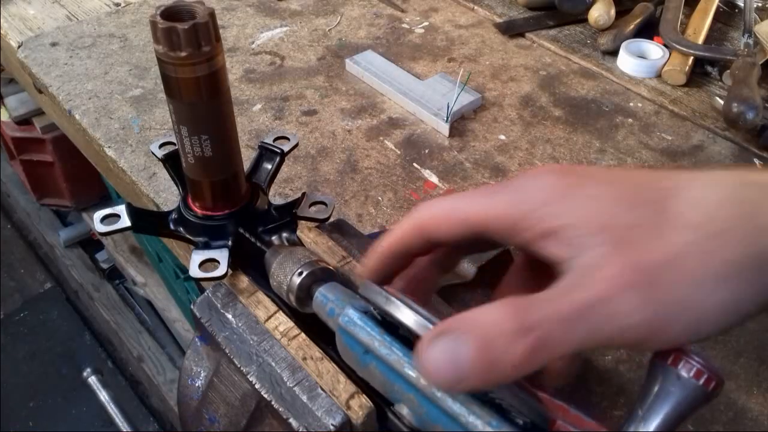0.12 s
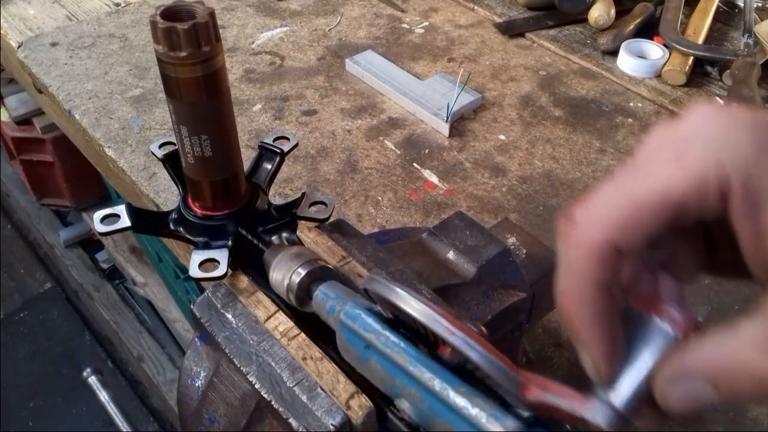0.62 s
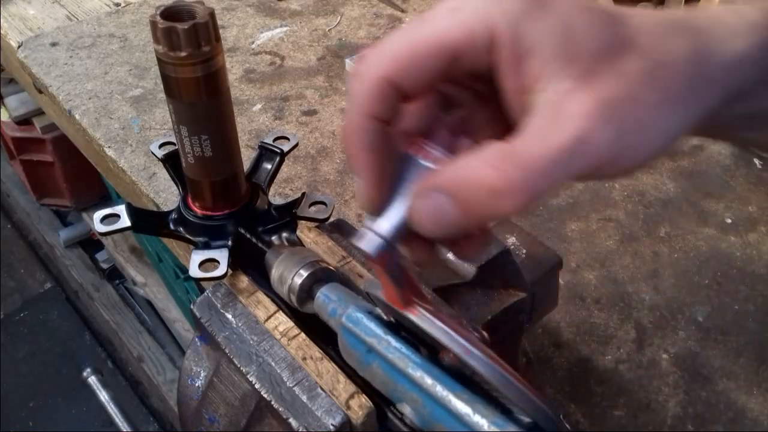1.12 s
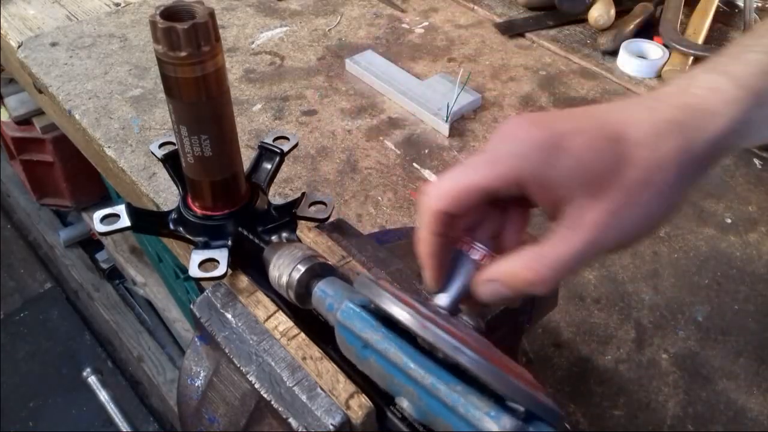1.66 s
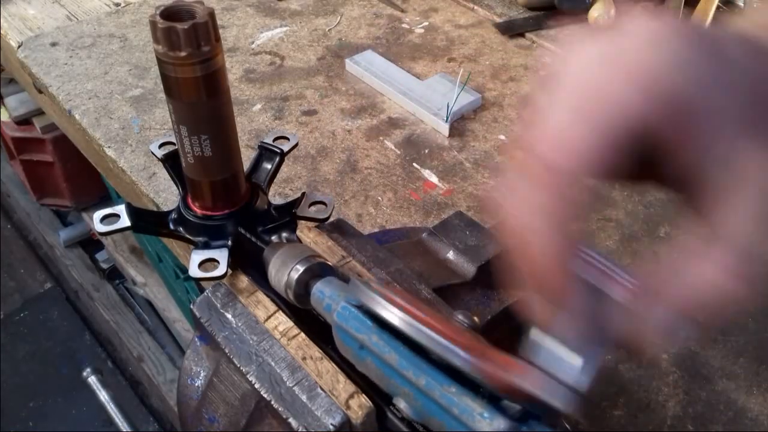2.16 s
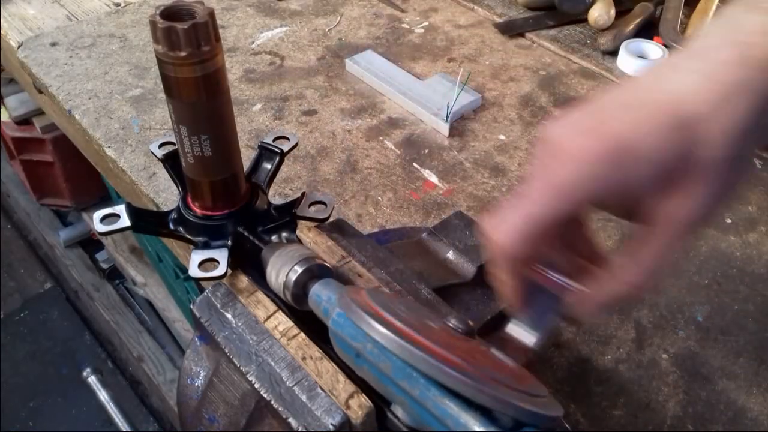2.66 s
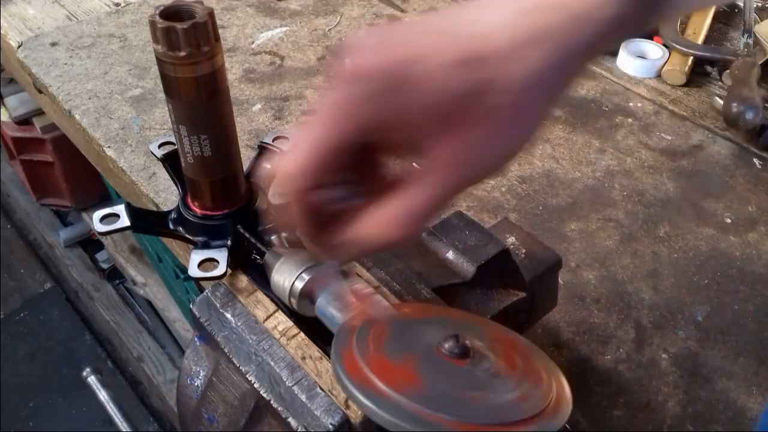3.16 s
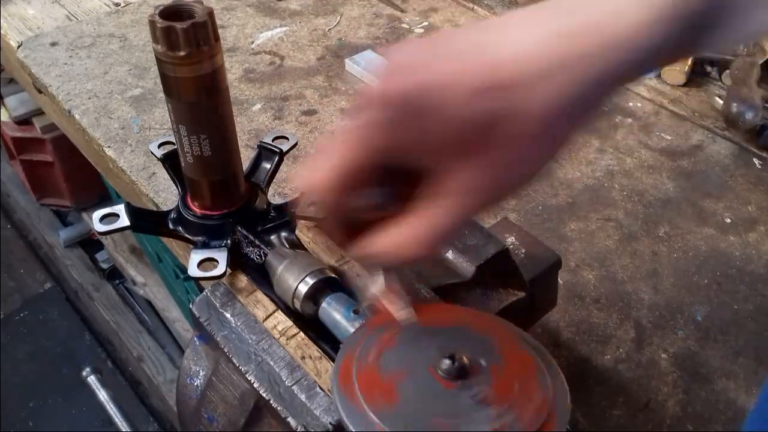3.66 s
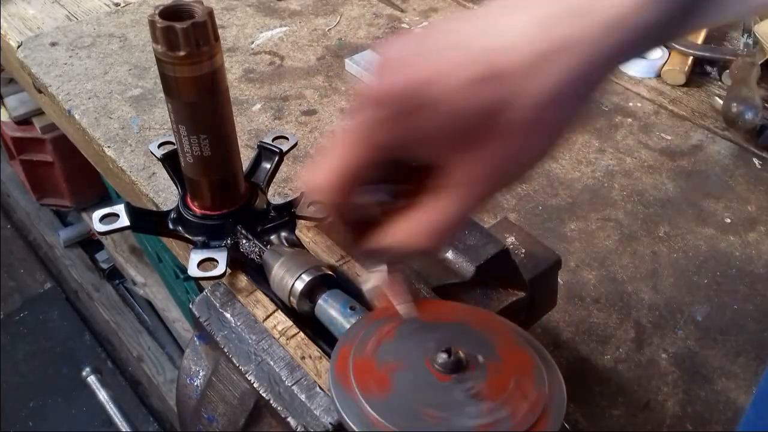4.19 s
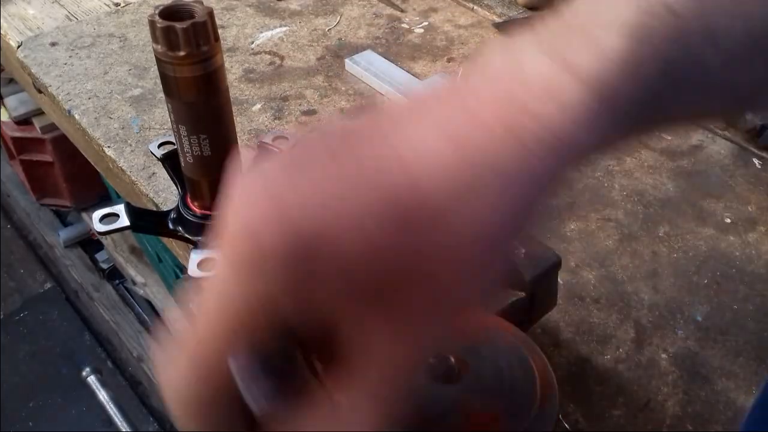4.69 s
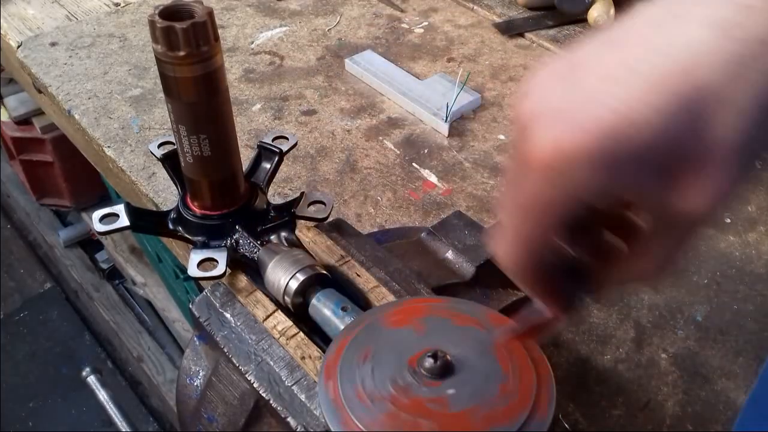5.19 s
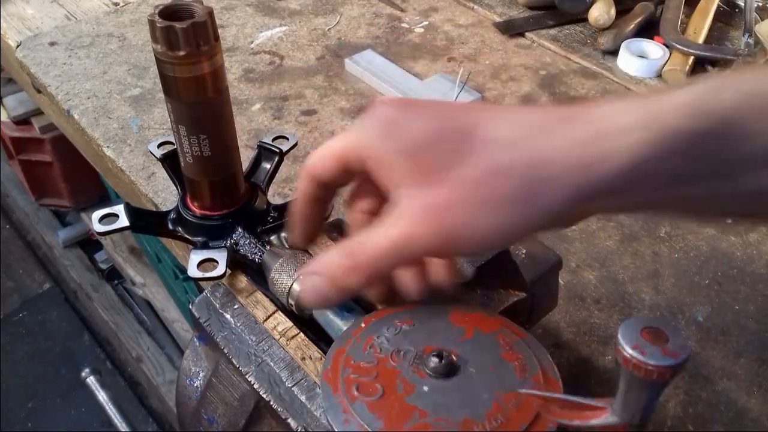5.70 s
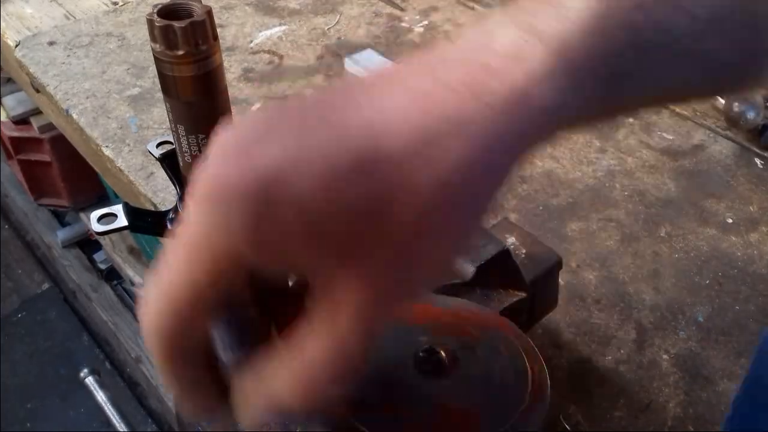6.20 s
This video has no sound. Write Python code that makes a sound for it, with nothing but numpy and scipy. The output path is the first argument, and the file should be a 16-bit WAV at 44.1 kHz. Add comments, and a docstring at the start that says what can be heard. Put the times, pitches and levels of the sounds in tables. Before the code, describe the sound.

Close, dull metal gears tick, scrape and knock as a hand crank turns in bursts, growing much louder before the bit briefly sticks and chatters.

```python
"""A hand drill clamped on a bench is cranked close to a small microphone: gear teeth tick and scrape while
the bit grinds into metal. Impacts and friction noise excite resonances of wheel, pinion, frame and bit.
Hard teeth knock singly and in rattles; fingers brush the wheel first, and late on the bit jams and chatters.
A faint workshop murmur lies behind. Both channels carry the same drill, but from midway on they slip
against each other in steps; each has its own hiss."""
import sys
import numpy as np
from scipy import signal
from scipy.fft import rfft, irfft, next_fast_len
from scipy.io import wavfile
from scipy.ndimage import uniform_filter1d, map_coordinates

SR = 44100
rng = np.random.default_rng(int(sys.argv[2]) if len(sys.argv) > 2 else 0)


def pcm_store(signal):
    """Save signal as 16-bit PCM."""
    levels = np.round(np.clip(np.atleast_2d(signal), -1, 1) * 32767)
    wavfile.write(sys.argv[1], SR, levels.astype(np.int16).T)


def boost(x):
    """Linear amplitude factor 10**(x/20) for a level x in decibels (scalar or array-like)."""
    u = np.asarray(x, float) / 20
    return 10 ** u


N = 279153

# Resonances of the drill's parts: (centre [Hz], width in each of two passes [Hz], gain [dB])
PINION_MODES = [(2934, 95, -5), (3189, 850, -2.5), (3547, 3300, -8.5)]
FRAME_MODES = [(185.4, 47, -3), (291, 94, -2.5), (394.6, 63, -4), (586.6, 92, 3), (742, 174, 0),
               (1146, 640, -3.5), (1299, 417, -2)]
BIT_MODES = [(5025, 143, 3), (5850, 140, 1), (6130, 220, -4.5), (7550, 940, 8.5)]
RIM_MODES = [(1523, 500, 2.8), (2544, 660, -1.8)]
# Friction between teeth: (time [s], grit and scrape over ticks [dB], clear over damped wheel ring [dB])
GRIND = [(0, 9, -25), (1.4, -3.5, -25), (1.6, 3, -18), (1.85, 7.5, 4), (2.2, 2.5, 11), (2.35, 3, -37),
         (2.5, 1, -31), (2.6, 4, 7), (3.0, -2.5, -1), (3.3, -1.5, -26), (4.5, -5, -25), (6.33, -3, -25)]
# The hand's steady effort on the crank:
# (time [s], wheel level [dB], wheel pitch before sag and wander [Hz], pinion over wheel [dB])
EFFORT = [(0, -81, 1910, 12), (0.11, -94, 2130, 8), (0.26, -73, 2430, 8), (0.43, -71, 1940, 6),
          (0.6, -65.5, 2260, 0), (0.78, -73.5, 2131, -10), (1.33, -67, 2060, 1.5), (1.65, -69, 2144, 7),
          (1.86, -51, 2000, -14), (2.15, -49.5, 2105, -3.5), (2.32, -47, 1941, 5.5), (2.68, -53.5, 2145, 2),
          (2.92, -45.5, 2110, 6), (3.04, -46, 1890, 5.5), (3.13, -40, 2070, 0), (3.5, -45.5, 2010, 3),
          (3.95, -48, 1980, -14), (4.3, -45.5, 2020, -14.5), (4.63, -40.5, 2030, -35),
          (4.97, -47.5, 1990, -3), (5.2, -45.5, 2060, -3), (5.6, -49.5, 2030, 5.5), (5.9, -49, 1970, -38),
          (6.16, -44, 2000, -7.5), (6.29, -37, 2590, 0), (6.33, -75, 2000, 19)]


def unit(x):
    """Normalization: scales a signal to rms 1."""
    return x / np.sqrt(np.mean(x ** 2, axis=-1, keepdims=True) + 1e-20)


def along(points, hz):
    """Interpolation of (frequency [Hz], value) points on a logarithmic frequency axis."""
    f, v = np.transpose(points)
    return np.interp(np.log(hz + 1), np.log(f + 1), v)


def curves(rows):
    """Piecewise linear envelopes: one value per sample for each column after the time."""
    s, *columns = np.transpose(rows)
    return [np.interp(np.arange(N) / SR, s, column) for column in columns]


def wobble(rate):
    """Band-limited random fluctuation: a smooth curve through rate random knots a second, at most 30."""
    return map_coordinates(rng.standard_normal(200), [np.arange(N) * rate / SR])


def filtered(x, response):
    """Linear filtering: the spectrum is multiplied by a complex response of frequency."""
    size = next_fast_len(N + SR // 2)
    return irfft(rfft(x, size) * response(np.fft.rfftfreq(size, 1 / SR)), size)[..., :N]


def rung(x, modes):
    """Modal superposition: causal second-order resonances, each applied twice for steep skirts, add up."""
    def response(f):
        total = 0
        for centre, width, db in modes:
            resonance = 1j * f * width / (centre ** 2 - f ** 2 + 1j * f * width)
            total = total + boost(db) * resonance ** 2
        return total
    return filtered(x, response)


def shifting(x, modes, depth_db):
    """Varying modal coupling: as the parts turn, each mode is excited more and less."""
    return sum(boost(depth_db * wobble(9)) * rung(x, [mode]) for mode in modes)


def gliding(x, hz, width_hz):
    """Resonance of moving pitch by heterodyning: shift down, two-pole low-pass, shift back."""
    turn = np.exp(2j * np.pi * np.cumsum(hz) / SR)
    pole = np.exp(-np.pi * width_hz / SR)
    ring = signal.lfilter([(1 - pole) ** 2], [1, -2 * pole, pole ** 2], x / turn) * turn
    return filtered(2 * ring.real, lambda f: (1j * f / (1000 + 1j * f)) ** 2)  # the bass is held back


def causal(points):
    """Minimum phase: folding the cepstrum gives the points' gain a causal response."""
    def response(hz):
        cepstrum = irfft(np.log(boost(along(points, hz))))
        half = len(cepstrum) // 2
        fold = np.r_[1, 2 * np.ones(half - 1), 1, np.zeros(len(cepstrum) - half - 1)]
        return np.exp(rfft(cepstrum * fold))
    return response


def coloured(spectrum, channels):
    """Spectral shaping: white noise is filtered to the given spectrum and scaled to rms 1."""
    noise = rng.standard_normal((channels, N))
    return unit(filtered(noise, lambda hz: boost(along(spectrum, hz))))


def contacts(times, sizes, life_s):
    """Impact and friction: each contact is a blow followed by a short dying scuff of noise."""
    spikes = np.bincount(np.clip((times * SR).astype(int), 0, N - 1), sizes, N)
    decay = np.exp(-np.arange(SR // 50) / (life_s * SR))
    scuff = signal.fftconvolve(spikes, decay)[:N] * rng.standard_normal(N)
    return spikes + boost(-18.5) * scuff


def channel_hiss(mono):
    """Level-dependent noise: notched hiss, independent in each channel, rises with the loudness of mono."""
    # Spectrum of the notched hiss: (frequency [Hz], relative level [dB])
    spectrum = [(300, 0.5), (3000, -4), (5000, -7.5), (9300, -9), (9800, -15.5), (10050, -27),
                (10500, -9.5), (14600, -8), (14950, -26), (15300, -38), (15700, -0.5), (15800, -60)]
    power = uniform_filter1d(mono ** 2, SR // 25)
    loudness_db = 10 * np.log10(np.abs(power) + 1e-9)
    rise_db = 6.0 * np.clip((loudness_db + 66.5) / 30, 0, 1)
    return boost(-72.5 + rise_db) * coloured(spectrum, channels=2)


def workshop_murmur(channels):
    """Diffuse background: the workshop's murmur is steady noise of a broad low spectrum."""
    # Murmur spectrum: (frequency [Hz], relative level [dB])
    spectrum = [(25, -50), (60, -11), (150, 1), (250, 3), (500, -0.5), (1000, -5), (2000, -8), (3500, -10),
                (4500, -19), (6000, -50)]
    return coloured(spectrum, channels)


def bench(x):
    """Reverberation: bench and walls answer with a diffuse random tail, redrawn so that no colouring builds up."""
    t, step = np.arange(SR // 8) / SR, SR // 6
    answer = np.zeros(N + step + len(t))
    for start in range(0, N, step):  # a new random tail six times a second
        tail = rng.standard_normal(len(t)) * boost(-60 * t / 0.068) * (t > 0.002)  # 60 dB in 68 ms
        piece = signal.fftconvolve(x[start:start + step], tail / np.linalg.norm(tail))
        answer[start:start + len(piece)] += piece
    return answer[:N]


def fingers():
    """Sliding friction: skin on painted metal makes a light bright rasp, noise through two broad resonances."""
    # Fingers slide over the wheel: (time [s], level [dB])
    slide = [(0, -64.5), (0.08, -72), (0.118, -83), (0.125, -46), (0.2, -54.5), (0.3, -58), (0.43, -58.5),
             (0.48, -50), (0.6, -59.5), (0.75, -75), (0.9, -97)]
    # Rasp resonances: (centre [Hz], width in each pass [Hz], gain [dB])
    rasp_modes = [(3740, 1300, 2), (3020, 1200, -2)]
    return boost(curves(slide)[0] + 1.6 * wobble(25.6)) * unit(rung(rng.standard_normal(N), rasp_modes))


def lurch():
    """Structural resonance: the drill lurches against the vise, which answers noise with a low shudder."""
    # Strength of the lurch: (time [s], level [dB])
    strength = [(1.672, -102.5), (1.682, -53.5), (1.74, -49), (1.77, -63), (1.9, -74)]
    # Vise resonances: (centre [Hz], width in each pass [Hz], gain [dB])
    vise_modes = [(150, 130, -3), (291, 61, 12.5)]
    return boost(curves(strength)[0]) * unit(rung(rng.standard_normal(N), vise_modes))


def jam():
    """Stick-slip: fast uneven slips of the stuck bit ring the chuck."""
    # Chuck resonances: (centre [Hz], width in each pass [Hz], gain [dB])
    chuck_modes = [(400, 178, -9.5), (1078, 165, 7), (1350, 332, -3), (2354, 224, 2), (2700, 260, -0.5),
                   (3800, 440, -7), (4738, 124, -6), (5546, 130, -10)]
    from_s, to_s, attack_s, release_s = 6.205, 6.296, 0.0065, 0.0083
    t = np.arange(N) / SR
    slips = rng.random((4000, 2))
    drive = contacts(slips[:, 0] * N / SR, 0.5 + slips[:, 1], life_s=0.003)
    held = np.clip(np.minimum((t - from_s) / attack_s, (to_s - t) / release_s), 0, 1)
    return boost(-29.5 + 1.47 * wobble(30)) * held * unit(rung(drive, chuck_modes))


def dip_gain():
    """Amplitude gating: gears and knocks dip briefly by 20.5 dB, with short edges."""
    # Level dips: (start [s], end [s])
    dips = [(3.607, 3.643), (5.667, 5.742), (6.297, 6.306)]
    t = np.arange(N) / SR
    inside = 1.0 * sum((t > start) & (t < end) for start, end in dips)
    return boost(-20.5 * uniform_filter1d(inside, SR // 400))


def hard_teeth():
    """Impact sequence: single knocks and rattles, tooth by tooth, as rows (s, dB, pinion dB) in time order."""
    # Single hard knocks: (time [s], blow level [dB], pinion over wheel [dB])
    single_knocks = [(0.1236, -39, 1), (0.138, -36.5, 23), (0.1793, -21, 15.5), (0.4342, -27.5, 3),
                     (0.4758, -18.5, 9), (0.5356, -36, -1), (0.6482, -39.5, -5), (0.687, -35.5, -5),
                     (0.7108, -41, -10), (1.0113, -42, -2), (1.1144, -36, 6), (1.6109, -35.5, 12),
                     (1.6787, -11.5, 5), (1.6889, -11.5, -3), (1.7321, -16.5, -5), (1.76, -15.5, -1),
                     (2.0912, -33, -3), (2.1079, -27, -1), (2.28, -21, 13), (2.3116, -17, -3.5),
                     (2.441, -18, -3), (2.5147, -18, 7), (2.794, -27, -6), (2.9356, -20, -3),
                     (2.952, -20.5, -11), (3.1238, -17.5, -1.5), (3.3813, -16.5, 3), (3.4054, -18, 8),
                     (3.4982, -18, 9), (3.5333, -13.5, 0), (3.5465, -12.5, -3), (3.8743, -10, 2),
                     (3.8865, -8.5, -1.5), (4.1252, -23, -13), (4.1604, -20, 1), (4.2021, -16, 3),
                     (4.3733, -20.5, 5), (4.4485, -16, 6), (4.4759, -17.5, 1), (4.5477, -24, 6),
                     (4.6459, -22.5, -10), (4.6573, -16, 2), (4.6827, -11.5, -0.5), (4.9402, -18, -7),
                     (4.974, -19, -6), (5.0254, -17, -8), (5.0507, -11, 20), (5.0598, -14, -3),
                     (5.0865, -13, 4), (5.1062, -15.5, 11.5), (5.1475, -18, -8.5), (5.2904, -20, 2),
                     (5.3977, -13, -2), (5.4154, -21, 2), (5.4838, -10.5, 4.5), (5.6286, -20.5, 26),
                     (5.6589, -9, 0), (5.7625, -31, 1), (5.8241, -22, -5), (5.9319, -11.5, -7.5),
                     (5.9845, -17, -8), (6.0043, -9, 7), (6.0161, -11, 2), (6.0338, -18.5, 4),
                     (6.148, -23, 8), (6.309, -36, -17)]
    # Rattles, in which every tooth knocks:
    # (first [s], last [s], teeth per second [1/s], mean blow level [dB], mean pinion over wheel [dB])
    rattles = [(1.4546, 1.5155, 47, -28, -8.5), (1.5401, 1.5611, 47, -36.5, 11),
               (1.904, 1.9395, 54, -39, -18), (1.953, 2.0396, 110, -33.5, -2),
               (3.2154, 3.2382, 85, -11.5, 4), (3.2867, 3.3328, 88, -19.5, 0),
               (3.4319, 3.4747, 92, -16, 2.5), (3.6535, 3.672, 97, -11.5, -3.5),
               (3.697, 3.7275, 95, -17, -5), (3.7414, 3.7644, 84, -12, 4.5),
               (3.9124, 3.9474, 85, -20.5, -5.5), (3.9917, 4.0228, 70, -23.5, -11),
               (4.2435, 4.269, 78, -16.5, 6), (4.5613, 4.6, 74, -12.5, 7.5), (4.7145, 4.771, 72, -19.5, -6),
               (5.311, 5.364, 78, -18.5, 0.5), (5.842, 5.9073, 80, -20, 0)]
    rows = []
    for first, last, rate, db, pinion_db in rattles:
        for s in np.linspace(first, last, round((last - first) * rate) + 1):
            rows.append((s, db, pinion_db))
    scatter = rng.standard_normal((len(rows), 3)) * [0, 2.5, 4]  # time, level [dB], pinion share [dB]
    rows = np.r_[single_knocks, rows + scatter]
    return rows[np.argsort(rows[:, 0])]


def knocks():
    """Impulse excitation: a hard tooth rings wheel and pinion in its own proportion."""
    s, db, pinion_db = hard_teeth().T
    share = 1 / (1 + boost(-pinion_db))
    low = contacts(s, boost(db) * (1 - share), life_s=0.00074)
    high = contacts(s, boost(db) * share, life_s=0.0026)
    wheel = boost(29.5) * gliding(low, curves(EFFORT)[1], width_hz=686)
    wheel_and_frame = wheel + boost(20.0) * rung(low, RIM_MODES) + boost(16.0) * rung(low, FRAME_MODES)
    pinion_and_bit = boost(20.0) * rung(high, PINION_MODES) + boost(16.5) * rung(high, BIT_MODES)
    rings = wheel_and_frame + pinion_and_bit
    return rings + boost(-4) * bench(rings)


def tooth_times():
    """Gear meshing: a whole number of teeth, near the meshing rate, evenly fills the time between knocks."""
    # Meshing rate: (time [s], teeth per second before rounding [1/s])
    teeth = [(0, 21.6), (1.0, 45), (1.6, 37.4), (1.85, 105), (2.07, 107.6), (2.3, 89.5), (2.7, 57),
             (2.9, 81.5), (3.2, 94.4), (3.68, 83.7), (4.0, 70), (4.4, 71.4), (4.85, 73.3), (5.05, 83),
             (5.6, 84), (6.33, 89)]
    count = np.cumsum(curves(teeth)[0]) / SR
    knock_times = np.r_[0, hard_teeth()[:, 0], N / SR]
    count_at_knocks = count[np.minimum((knock_times * SR).astype(int), N - 1)]
    gaps = np.maximum(np.round(np.diff(count_at_knocks)), 1)
    number = np.r_[0, np.cumsum(gaps)]
    ordinary = np.setdiff1d(np.arange(number[-1]), number)  # the knocks themselves are left out
    return np.interp(ordinary, number, knock_times)


def meshing():
    """Impact and friction drive: uneven tooth ticks, weaker rebounds, grit and scrape, with the bench's answer."""
    times = tooth_times()
    luck = rng.standard_normal((len(times), 4))
    ticks = contacts(times + 0.00064 * luck[:, 0], boost(2 * luck[:, 1]), life_s=0.0012)
    rebound_times = times + 0.0055 + 0.0014 * luck[:, 2]
    rebounds = contacts(rebound_times, boost(-13.5 + 1.6 * luck[:, 3]), life_s=0.0024)
    grit = rng.random((6000, 2))
    chip_sizes = boost(-2 * np.log(1 - grit[:, 1]))  # exponentially distributed in dB
    chips = contacts(grit[:, 0] * N / SR, chip_sizes, life_s=0.00097)
    scrape = boost(-5.5) * rng.standard_normal(N)
    grind = boost(curves(GRIND)[0])
    drive = unit(ticks + rebounds) + grind * unit(unit(chips) + scrape)
    drive = drive / np.sqrt(1 + grind ** 2)
    return unit(drive + boost(-2.0) * bench(drive))


def bites():
    """Load transients: power of all bites at wheel and pinion, each rising and decaying exponentially."""
    # The bit bites and the gears strain: (peak time [s], wheel level [dB], rise over 10 dB [s],
    # fall over 10 dB [s], pinion over wheel [dB])
    strains = [(0.124, -59, 0.0017, 0.22, -8), (0.196, -55, 0.019, 0.036, 7.5),
               (0.439, -51, .003, 0.033, -4), (0.491, -45.5, 0.041, 0.031, -5.5),
               (0.706, -53, 0.044, 0.025, -20), (1.03, -69.5, 0.19, .07, -2), (1.129, -65, .03, .3, 2),
               (1.474, -43.5, 0.065, 0.11, -4), (1.681, -31, 0.0017, 0.053, 2),
               (1.766, -30.5, 0.025, 0.046, -5), (2.131, -40, 0.13, .2, -3),
               (2.299, -40.5, 0.14, 0.063, 0.5), (2.456, -35.5, 0.14, 0.16, -6),
               (2.806, -37, 0.067, 0.063, -4.5), (2.955, -31, 0.04, 0.086, -8.5),
               (3.157, -35, 0.019, 0.051, -4), (3.225, -34, 0.065, 0.025, 4.5),
               (3.32, -35.5, 0.021, 0.13, -1), (3.544, -36.5, .15, 0.013, 0),
               (3.654, -32, 0.0044, 0.12, -2), (3.747, -30.5, 0.11, 0.02, -4),
               (3.88, -27.5, 0.048, 0.013, -6.5), (4.258, -38.5, .3, 0.029, -0.5),
               (4.37, -57.5, .05, .1, -11), (4.454, -39, 0.088, .15, 0), (4.588, -26.5, 0.026, 0.015, -6),
               (4.675, -34, 0.013, 0.017, 3), (4.782, -35.5, 0.087, 0.027, -7),
               (4.925, -38.5, 0.061, 0.012, -6), (5.056, -26.5, 0.033, 0.037, -2),
               (5.396, -38.5, 0.21, 0.17, -5), (5.577, -37, 0.11, 0.038, -19.5),
               (5.66, -30, .015, 0.0023, -2), (5.747, -58, .004, 0.092, 9),
               (5.794, -33.5, 0.0063, 0.094, -6.5), (6.014, -35, 0.18, 0.081, -2.5),
               (6.218, -44, 0.083, 0.05, -2), (6.254, -49.5, 0.038, 0.074, -11)]
    t, wheel, pinion = np.arange(N) / SR, 0, 0
    for s, db, rise_s, fall_s, pinion_db in strains:
        distance = np.where(t < s, (s - t) / rise_s, (t - s) / fall_s)
        power = boost(2 * (db - 10 * distance))
        wheel = wheel + power
        pinion = pinion + power * boost(2 * pinion_db)
    return wheel, pinion


def gears():
    """Forced vibration: meshing shakes wheel, pinion, bit and frame; the hand's pressure bends the wheel's pitch."""
    # How the hand leans: (time [s], frame pressed into the vise [dB], bit pressed into the metal [dB])
    lean = [(0, 10, 19), (0.7, 3.5, 5), (1.5, 5.5, -7.5), (2.2, -1, -2.5), (2.65, 0.5, 3), (3.2, -3, -1.5),
            (3.7, -4, 6), (4.1, 3, 9), (4.6, -1, -2), (5.1, 1, 6), (5.6, 2.5, 0), (6.33, 2, 0.5)]
    effort_db, wheel_hz, pinion_db = curves(EFFORT)
    steady = boost(2 * effort_db)  # power
    bite, bite_pinion = bites()

    def strength(steady_db, bite_db):
        return np.sqrt(steady * boost(2 * steady_db) + bite * boost(2 * bite_db))

    sag_hz = 40 * bite / (steady + bite)  # the pitch drops while a bite outweighs the steady effort
    wheel_hz = wheel_hz - sag_hz + 50 * wobble(11)
    drive = meshing()

    ring = boost(curves(GRIND)[1])  # a freely turning wheel rings longer
    damped = unit(gliding(drive, wheel_hz, width_hz=710))
    damped = damped + boost(-4.5) * unit(shifting(drive, RIM_MODES, depth_db=3))
    free = unit(gliding(drive, wheel_hz, width_hz=260))
    wheel = np.sqrt(steady + bite) * (damped + ring * free) / (1 + ring)

    pinion_level = np.sqrt(steady * boost(2 * pinion_db) + bite_pinion)
    pinion = pinion_level * unit(shifting(drive, PINION_MODES, depth_db=2.5))

    frame_db, bit_db = curves(lean)
    bit = boost(bit_db) * strength(-4.5, -4.5) * unit(rung(drive, BIT_MODES))
    frame = unit(rung(drive + boost(-12.0) * rng.standard_normal(N), FRAME_MODES))
    # the frame hums with the steady effort, less with the bites
    frame = strength(-5.5, -13.5) * boost(frame_db) * frame
    return dip_gain() * (wheel + pinion + bit + frame)


def scene():
    """Superposition: the drill is alike in both channels; part of the murmur is shared, part independent."""
    drill = gears() + dip_gain() * knocks() + jam() + lurch() + fingers()
    near = drill + boost(-68.0) * workshop_murmur(channels=1)[0]
    return np.array([near, near]) + boost(-69.5) * workshop_murmur(channels=2)


def slipped(right):
    """Interchannel delay: the channel is spliced from copies of itself at stepwise changing delays."""
    # Delay steps: (start [s], lag of the left channel behind the right [ms])
    steps = [(0, 0), (3.137, 1.54), (3.225, -9.43), (3.27, 4.44), (3.312, 2.81), (3.352, -0.09),
             (3.626, -0.91), (3.731, -3.17), (3.773, -2.09), (3.808, -0.09), (4.285, 6.17), (4.32, -0.27),
             (4.395, 0.27), (4.489, 5.9), (4.532, -8.8), (4.564, 4.44), (4.617, -4.17), (4.654, -4.08),
             (4.699, 1.18), (4.739, 0.63), (4.781, 0.18), (4.903, -3.54), (4.956, 1.72), (5.033, 1.18),
             (5.076, -1.63), (5.123, 5.9), (5.163, 4.97), (5.2, 0.63), (5.412, -2.0), (5.502, 6.35),
             (5.542, 8.98), (5.577, 0.54), (5.619, 2.45), (5.704, 0.18)]
    edges = [round(s * SR) for s, _ in steps] + [N]
    spliced = np.zeros(N)
    for (_, ms), start, end in zip(steps, edges, edges[1:]):
        inside = np.zeros(N)
        inside[start:end] = 1
        fade = uniform_filter1d(inside, SR // 100, mode="nearest")  # 10 ms cross-fade
        spliced += fade * np.roll(right, -round(ms * SR / 1000))
    return spliced


def roll_off(x):
    """The treble ends steeply here."""
    return signal.sosfilt(signal.butter(12, 15750, fs=SR, output="sos"), x)


def record(dry):
    """Transduction: the microphone's response, slipping channels, added hiss and a small constant offset."""
    # Microphone response: (frequency [Hz], gain [dB])
    microphone = [(25, -27), (60, 6), (160, -3.5), (3900, 2), (4600, -8), (5200, -20), (6500, -23),
                  (7600, -29), (9000, -31.5), (12000, -42)]
    left, right = filtered(dry, causal(microphone))
    mix = np.array([left, slipped(right)]) + channel_hiss(left) - 0.0006
    return roll_off(mix)


dry = scene()
out = record(dry)
pcm_store(out)
```